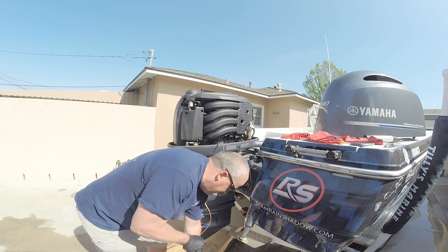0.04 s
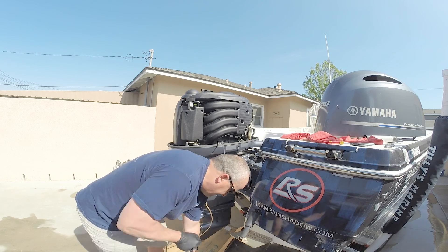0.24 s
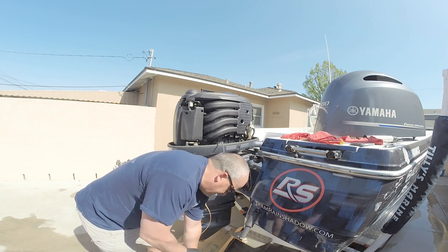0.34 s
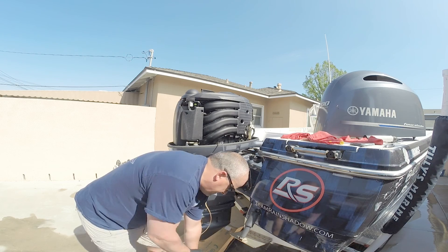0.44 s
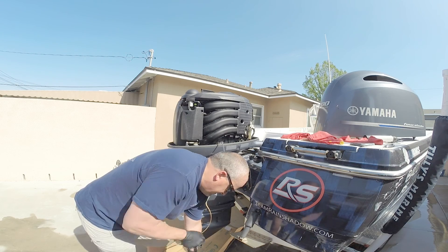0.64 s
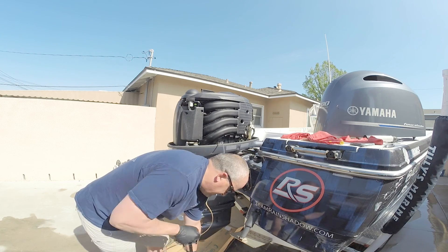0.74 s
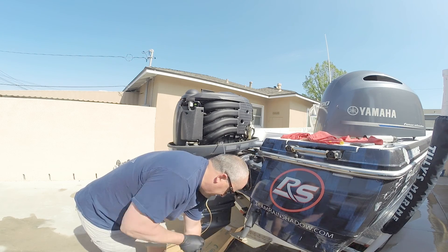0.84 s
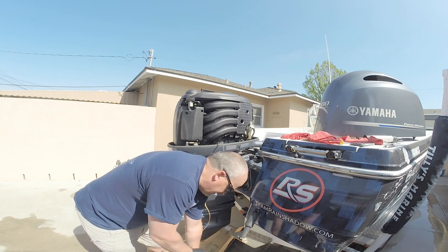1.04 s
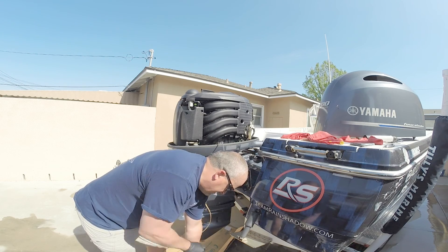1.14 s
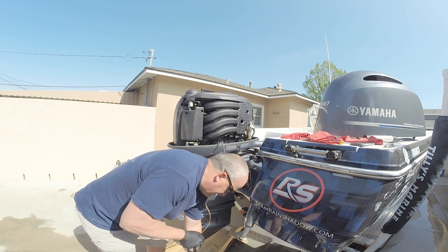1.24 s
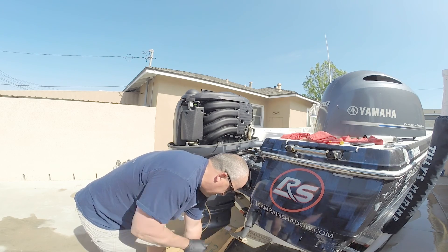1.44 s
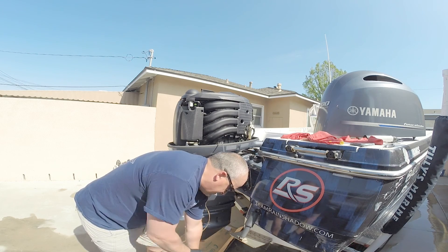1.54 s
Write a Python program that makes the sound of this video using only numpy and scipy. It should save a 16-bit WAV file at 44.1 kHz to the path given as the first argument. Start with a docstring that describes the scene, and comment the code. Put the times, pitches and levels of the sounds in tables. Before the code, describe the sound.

Close by outdoors, a hand pump repeats three strokes: the handle clacks, air hisses and the plunger lands with a hollow knock. Dull thuds and small ticks fall between, while walls echo briefly and faint wind touches the microphone.

```python
"""Hand pump in a walled yard

One microphone near a hand pump worked beside a boat, about one stroke every 0.6 s. A stroke brings
the handle's sharp clack, the plunger's dull thud, a soft valve bump, a swelling hiss of air and a hollow
knock at the end of travel, with small ticks and rubs between. Hull and walls return a short echo.
Light wind rumbles on the microphone over a quiet outdoor background."""
import sys
import numpy as np
from scipy import signal
from scipy.fft import rfft, irfft, next_fast_len
from scipy.io import wavfile

SR = 44100
rng = np.random.default_rng(int(sys.argv[2]) if len(sys.argv) > 2 else 0)


def dump(signal):
    """Clip the signal to [-1, 1] and save it as 16-bit WAV at the path in sys.argv[1]."""
    limited = np.clip(np.atleast_2d(signal).T, -1, 1)
    pcm = np.round(limited * 32767).astype(np.int16)
    wavfile.write(sys.argv[1], SR, pcm)


N = 70560

# Spectra of the steady noises at the microphone. Each row: frequency in Hz, relative level in dB.
YARD_SPECTRUM = [(20, -5.5), (60, 1.5), (140, -1.5), (250, -9), (420, -6.5), (600, -7.5), (950, -18.5),
                 (1250, -8.5), (1600, -22), (2400, -23), (3500, -28), (6000, -30), (9000, -38.5),
                 (15000, -51)]
WIND_SPECTRUM = [(15, -8), (30, -4.5), (55, -12.5), (90, -21), (120, -8.5), (200, -32.5), (600, -71.5)]
SLIDE_SPECTRUM = [(300, -0.5), (1200, 4), (2500, -8.5), (6500, -15), (10000, -21.5), (15000, -27)]
HISS_SPECTRUM = [(800, -4), (1500, -3.5), (2400, -7.5), (3200, -6.5), (4200, -12.5), (5000, -8),
                 (5600, 1.5), (6800, -4.5), (7900, -16.5), (9300, -26), (15000, -32.5)]
# Spectra of the pump's impacts. Each row: frequency in Hz, relative level in dB.
TICK_SPECTRUM = [(300, -10.5), (1500, 8), (3200, -6), (5500, -4), (8000, -19.5), (14000, -26.5),
                 (16000, -35)]
BUMP_SPECTRUM = [(30, -8), (100, -3.5), (250, -4), (620, -5.5), (1000, -26), (3000, -24.5), (7000, -29.5),
                 (14000, -61)]
THUD_SPECTRUM = [(60, -32), (130, -6), (230, 6), (500, -2), (650, -4), (1150, -9.5), (1600, -35.5),
                 (4000, -54), (8000, -57.5), (16000, -87)]
CLACK_SPECTRUM = [(60, -20), (140, -3.5), (450, 1.5), (700, -5), (1050, -4.5), (1400, -2.5), (2300, -7),
                  (4100, -5.5), (4800, 3.5), (5550, 2.5), (6200, -17), (10000, -19), (11500, -31),
                  (13300, -22), (16000, -41.5)]
KNOCK_SPECTRUM = [(70, -51.5), (120, -24), (180, -12), (290, -9), (410, 5), (520, -6.5), (640, -7),
                  (860, -3.5), (1010, -22.5), (1130, -2), (1330, -8), (1550, -19), (2400, -27.5),
                  (3400, -32), (6000, -51.5), (14000, -67)]
# What hull and walls send back. Each row: frequency in Hz, relative level in dB.
CLACK_ECHO_SPECTRUM = [(88, -26), (150, -11.5), (318, -2), (535, 2), (742, -6.5), (1010, 3), (1600, -5.5),
                       (2060, -4), (2550, -4.5), (2810, -7.5), (3470, -4), (4370, -5), (4810, -2.5),
                       (6180, -15), (7940, -23.5), (9820, -18.5), (15000, -29)]
KNOCK_ECHO_SPECTRUM = [(88, -32.5), (150, -19.5), (194, -11), (233, -9.5), (368, -10.5), (419, -6.5),
                       (593, -6), (650, -9), (1070, -12.5), (1330, -14.5), (2060, -29), (3710, -33.5),
                       (12000, -72), (15600, -105), (22000, -120)]
# Early bounces off ground and hull. Each row: delay in seconds, level in dB against the direct sound.
NEAR_REFLECTIONS = [(.0055, -15.5), (0.026, -22)]
# Ringing of the struck parts. Each row: frequency in Hz, relative level in dB, seconds to fall 60 dB.
PLUNGER_RESONANCES = [(185, -4, .07), (236, 4.5, 0.1), (340, -21, 0.024), (408, 13, 0.021),
                      (507, -0.5, .07), (733, 2.5, 0.065), (1082, -4, 0.083)]
HANDLE_RESONANCES = [(493, -22, 0.043), (668, 1, 0.027), (896, -2.5, 0.057), (1070, -10, 0.043),
                     (1187, -7, 0.079), (1290, -11.5, 0.17), (1586, -4, .05), (1897, 1, 0.033),
                     (2093, 7, 0.02), (2358, -10.5, 0.11), (2913, -4.5, 0.0696), (3405, -2.5, 0.032),
                     (3763, -10.5, 0.066), (4496, 2.5, 0.027), (4505, 7, 0.018), (4986, 7.5, 0.029),
                     (5535, 3.5, 0.013)]
# Brief low tones that nearby reflections give the knock.
# Each row: frequency in Hz, relative level in dB, seconds to fall 60 dB.
KNOCK_TONES = [(171.4, -19, 0.15), (357, -10, 0.039), (398.8, -0.5, 0.16), (451, 2.5, 0.1),
               (533.3, -4, 0.095), (586, -9.5, 0.17), (625, -4.5, 0.067), (783, -8, 0.081),
               (885, -11.5, .09), (1076, -11.5, 0.1), (1226, -10, 0.04), (1272, -9, 0.17)]
# Wind on the microphone. Each row: time in seconds, level in dB.
WIND_LEVELS = [(0, -59), (.2, -42), (.3, -38), (.38, -35), (.46, -47), (.7, -59), (.85, -45.5),
               (1.0, -45.5), (1.3, -59), (1.45, -41), (1.6, -50)]
# The plunger's way back. Each row: start in seconds, length in seconds, level in dB.
PLUNGER_RETURNS = [(0.089, 0.14, -50.5), (0.68, 0.11, -58.5), (1.287, 0.076, -59)]
# Pushes of air through the valve. Each row: start in seconds, end in seconds, full level in dB.
AIR_PUSHES = [(0.374, 0.487, -41), (0.953, 1.068, -41.5), (1.515, 1.636, -43)]
# The pump's impacts. Each row: start in seconds, level in dB, treble tilt in dB per octave.
VALVE_TICKS = [(0.052, -41.5, -4.5), (0.3662, -46, -2), (.3875, -41.5, 0), (.4900, -33.5, 2),
               (.9505, -50.5, 0.5), (1.0747, -33, -1), (1.5138, -52, 3)]
VALVE_BUMPS = [(0.367, -33, -0.5), (0.9511, -35.5, -1), (1.5173, -36.5, -3)]
PLUNGER_THUDS = [(.2547, -22.5, 1.5), (0.8304, -24, 2)]
HANDLE_CLACKS = [(0.2109, -15, -1), (0.792, -20, -0.5), (1.4205, -26, -8)]
END_KNOCKS = [(-.062, -10, -1.5), (0.491, -20, 1), (0.4992, -11.5, -1), (1.0760, -25, -6),
              (1.0843, -11.5, -1.3)]  # the tail of one knock, then pairs: a light touch and the full blow

LEVEL_WINDOW_S = 0.01


def undb(db):
    """Decibels to gain."""
    return 10 ** (np.asarray(db) / 20)


def unit(x):
    """Scale a steady sound to rms 1."""
    return x / np.sqrt(np.mean(x ** 2))


def unit_hit(x):
    """Scale a blow to the energy of rms 1 held for the level window."""
    return x / np.sqrt(np.sum(x ** 2) / (LEVEL_WINDOW_S * SR))


def colour(x, spectrum):
    """Minimum-phase filter through (Hz, dB) points."""
    hz, db = np.array(spectrum, float).T
    size = next_fast_len(2 * N)
    bin_hz = np.maximum(np.arange(size // 2 + 1) * SR / size, 1)
    gain = undb(np.interp(np.log(bin_hz), np.log(hz), db))
    cepstrum = irfft(np.log(gain), size)
    cepstrum[1:size // 2] *= 2  # folded forward, so nothing sounds ahead of a blow
    cepstrum[size // 2 + 1:] = 0
    return irfft(np.exp(rfft(cepstrum)) * rfft(x, size), size)[:N]


def noise(spectrum):
    """Steady coloured noise, rms 1."""
    return unit(colour(rng.standard_normal(N), spectrum))


def fade(t60):
    """Decay that loses 60 dB in t60 seconds."""
    return np.exp(-np.log(1000) * np.arange(N) / SR / t60)


def later(x, seconds):
    """Shift a sound in time; a negative start leaves only its tail."""
    shift = int(round(seconds * SR))
    delay, skip = max(shift, 0), max(-shift, 0)
    return np.pad(x, (delay, skip))[skip:][:N]


def contact(spectrum, chatter_db, chatter_t60):
    """One impact followed by a short burst of dense chatter."""
    impact = unit_hit(signal.unit_impulse(N))
    chatter = unit_hit(rng.standard_normal(N) * fade(chatter_t60))
    return unit_hit(colour(impact + undb(chatter_db) * chatter, spectrum))


def fading_tones(rows, build_s):
    """Tones that build up quickly after a blow and die away."""
    t = np.arange(N) / SR
    tones = sum(undb(db) * fade(t60) * np.cos(2 * np.pi * hz * t) for hz, db, t60 in rows)
    return unit_hit(tones * (1 - np.exp(-(t / build_s) ** 2)))


def play(blow, events, corner_hz=1000):
    """The same blow at each time, with its own strength and treble slope above the corner."""
    octaves, out = np.arange(4), 0
    for start, db, tilt in events:
        slope = list(zip(corner_hz * 2. ** octaves, tilt * octaves))
        out = out + undb(db) * later(colour(blow, slope), start)
    return out


def yard_and_wind(yard_db=-50.5):
    """The quiet yard all round, and low gusts buffeting the microphone."""
    gusts = undb(np.interp(np.arange(N) / SR, *np.array(WIND_LEVELS).T))
    return undb(yard_db) * noise(YARD_SPECTRUM) + gusts * noise(WIND_SPECTRUM)


def yard_echo(spectrum, early_t60, late_t60, late_db, build_s=0.012, damping_hz=9040):
    """Quick scatter off the nearby hull, then a longer, duller tail from the walls."""
    scatter = noise(spectrum)
    dulled = signal.sosfilt(signal.butter(2, damping_hz, fs=SR, output="sos"), scatter)
    hull = scatter * fade(early_t60)
    walls = undb(late_db) * dulled * fade(late_t60)
    build = 1 - np.exp(-np.arange(N) / SR / build_s)
    return unit_hit((hull + walls) * build)


def near_reflections(direct):
    """Bounces off ground and hull reach the microphone just behind the direct sound."""
    return sum(undb(db) * later(direct, delay) for delay, db in NEAR_REFLECTIONS)


def plunger_slides():
    """The plunger rubs softly as it is drawn back."""
    t, rub = np.arange(N) / SR, 0
    for start, length, db in PLUNGER_RETURNS:
        travel = np.clip((t - start) / length, 0, 1)
        rub = rub + undb(db) * np.sqrt(np.abs(np.sin(np.pi * travel)))
    return rub * noise(SLIDE_SPECTRUM)


def air_jet(centre_hz, width_hz=330):
    """The jet's resonance: a narrow band of air noise around a moving centre."""
    lowpass = signal.butter(2, width_hz / 2, fs=SR, output="sos")
    flutter = signal.sosfilt(lowpass, rng.standard_normal(N))
    return unit(flutter * np.sin(2 * np.pi * np.cumsum(centre_hz) / SR))


def valve_hiss(jet_start_hz=6700, jet_end_hz=7910, swell_db=12, full_at_travel=0.66, release_s=0.007):
    """Air through the valve swells during the push; its jet resonance rises as pressure builds."""
    t, out = np.arange(N) / SR, 0
    for start, end, db in AIR_PUSHES:
        travel = np.clip((t - start) / (end - start), 0, 1)
        whistle = undb(-14.5) * air_jet(jet_start_hz + (jet_end_hz - jet_start_hz) * travel)
        swell = undb(db - swell_db * np.maximum(1 - travel / full_at_travel, 0))
        gate = (t > start) * np.exp(-np.maximum(t - end, 0) / release_s)
        out = out + swell * gate * (noise(HISS_SPECTRUM) + whistle)
    return out


def valve_ticks():
    """Valve and linkage give short scraping ticks as the valve opens and shuts."""
    return play(contact(TICK_SPECTRUM, chatter_db=7, chatter_t60=0.088), VALVE_TICKS)


def valve_bumps():
    """The valve opens with a soft bump at the start of the hiss."""
    bump = contact(BUMP_SPECTRUM, chatter_db=9.5, chatter_t60=0.035)
    echo = undb(-3) * yard_echo(BUMP_SPECTRUM, early_t60=0.054, late_t60=0.51, late_db=-17)
    return play(bump + echo, VALVE_BUMPS)


def plunger_thuds():
    """Just after the clack, the plunger takes up its load with a dull thud."""
    thud = contact(THUD_SPECTRUM, chatter_db=-2, chatter_t60=0.033)
    ringing = undb(-3) * fading_tones(PLUNGER_RESONANCES, build_s=0.003)
    echo = undb(-5) * yard_echo(THUD_SPECTRUM, early_t60=0.14, late_t60=0.74, late_db=-9)
    return play(thud + ringing + echo, PLUNGER_THUDS)


def handle_clacks(rebound_s=0.0019):
    """Opening a stroke, the handle snaps against its stop, rebounds at once and rings."""
    snap = contact(CLACK_SPECTRUM, chatter_db=10, chatter_t60=0.0052)
    rebound = later(contact(CLACK_SPECTRUM, chatter_db=13, chatter_t60=0.011), rebound_s)
    ringing = undb(-3) * fading_tones(HANDLE_RESONANCES, build_s=0.00091)
    echo = undb(-4) * yard_echo(CLACK_ECHO_SPECTRUM, early_t60=0.06, late_t60=0.36, late_db=-16.5)
    return play(unit_hit(snap + rebound) + ringing + echo, HANDLE_CLACKS, corner_hz=1900)


def delay_lows(knock, centre_hz=990, q=0.95):
    """All-pass filter: the lows arrive up to about a millisecond behind the treble."""
    angle = 2 * np.pi * centre_hz / SR
    damping = np.sin(angle) / (2 * q)
    feedback = np.array([1 + damping, -2 * np.cos(angle), 1 - damping])
    return signal.lfilter(feedback[::-1], feedback, knock)


def end_knocks():
    """The plunger bottoms out with a hollow knock."""
    blow = contact(KNOCK_SPECTRUM, chatter_db=3, chatter_t60=0.028)
    tones = undb(-9) * fading_tones(KNOCK_TONES, build_s=0.0032)
    knock = delay_lows(blow + tones)
    echo = undb(-7.5) * yard_echo(KNOCK_ECHO_SPECTRUM, early_t60=0.069, late_t60=0.41, late_db=-13.5)
    return play(knock + near_reflections(knock) + echo, END_KNOCKS)


def scene():
    """The pump in front and the yard behind it, in mono."""
    pump = handle_clacks() + plunger_thuds() + valve_bumps() + valve_hiss()
    pump += valve_ticks() + end_knocks() + plunger_slides()
    return (pump + yard_and_wind())[None]


def record(dry, top_hz=15200):
    """The recorder clips at full scale and cuts the highest treble."""
    lowpass = signal.ellip(8, 0.2, 70, top_hz, fs=SR, output="sos")
    return signal.sosfilt(lowpass, np.clip(dry, -1, 1))


dry = scene()
out = record(dry)
dump(out)
```